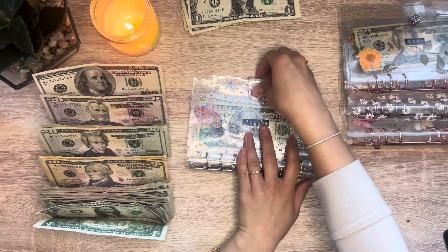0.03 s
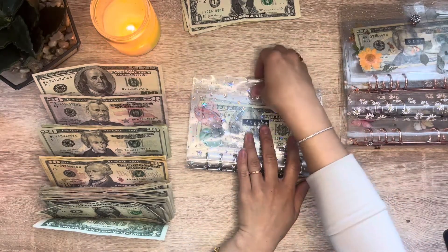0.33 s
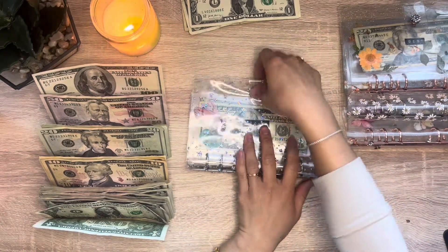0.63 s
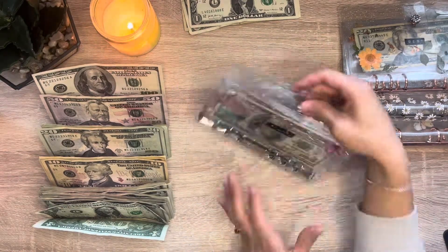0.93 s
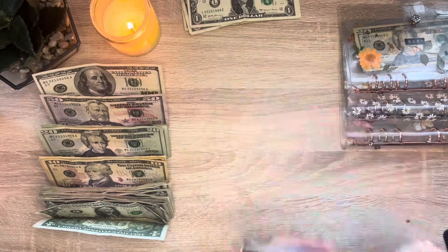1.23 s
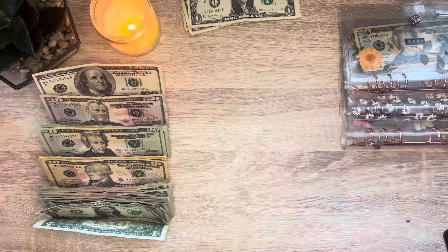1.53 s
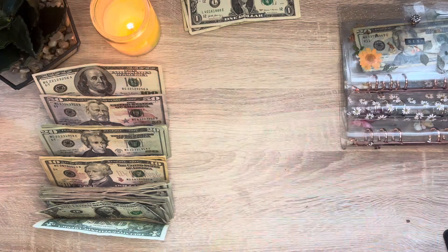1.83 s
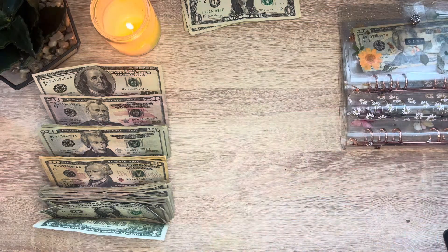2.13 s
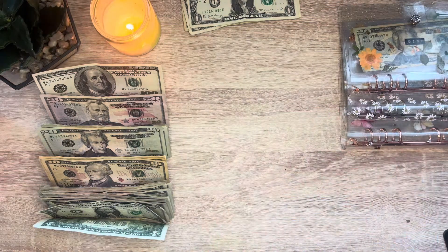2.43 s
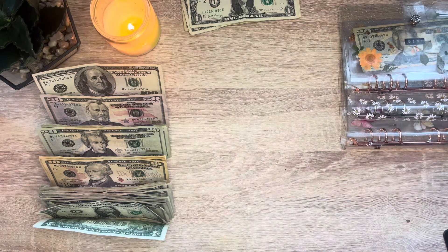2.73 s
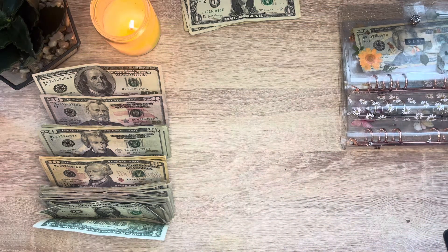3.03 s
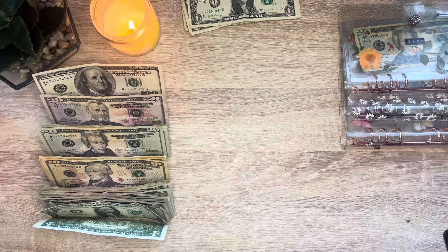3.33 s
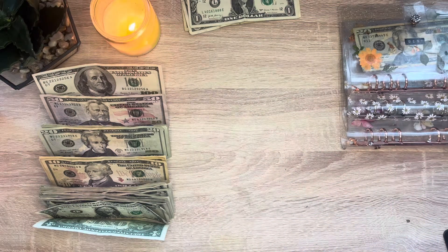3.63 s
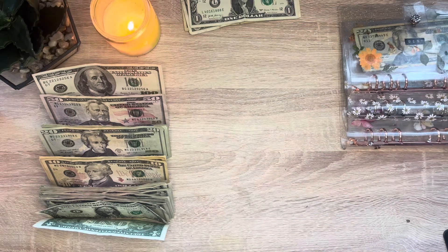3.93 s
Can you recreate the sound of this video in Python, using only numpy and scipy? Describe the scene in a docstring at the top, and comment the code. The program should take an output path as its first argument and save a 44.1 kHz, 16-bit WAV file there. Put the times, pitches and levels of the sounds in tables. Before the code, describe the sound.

In a small room with faint humming ventilation, a plastic binder's fastener closes with one sharp, close snap. Quieter crackles, knocks and sliding plastic follow as the binder is picked up from a wooden table and set down.

```python
"""A press stud snaps a plastic cash binder shut on a wooden table; it cracks and the cover rings.
The binder is lifted and put down to one side: the spine knocks, the table thumps, the plastic
clicks as it buckles and the sleeves slide with grainy friction. Ventilation hums low in a
small room, heard through a closely spaced pair of microphone ports."""
import sys
import numpy as np
from scipy import signal
from scipy.fft import rfft, irfft
from scipy.io import wavfile

SR = 44100
rng = np.random.default_rng(int(sys.argv[2]) if len(sys.argv) > 2 else 0)


def to_wav(s):
    """Save 16-bit WAV."""
    ch = np.atleast_2d(s).T  # columns
    pcm = np.round(np.clip(ch, -1, 1) * 32767)  # PCM
    wavfile.write(sys.argv[1], SR, pcm.astype(np.int16))


N = 176400
T = np.arange(N) / SR
F = np.maximum(np.fft.rfftfreq(N, 1 / SR), 1)


def undb(db):
    """Decibels to gain."""
    return 10 ** (np.asarray(db) / 20)


def unit(x):
    """Scale to unit energy."""
    return x / np.sqrt(np.sum(x ** 2))


def curve(points):
    """Join (f/Hz, value) points on a log-frequency axis."""
    hz, values = np.array(points).T
    return np.interp(np.log(F), np.log(hz), values)


def colour(x, points):
    """Minimum-phase filter that keeps the power of white noise."""
    gain = undb(curve(points))
    cepstrum = irfft(np.log(gain / np.sqrt(np.mean(gain ** 2))), N)
    cepstrum[1:N // 2] *= 2
    cepstrum[N // 2 + 1:] = 0
    return irfft(rfft(x) * np.exp(rfft(cepstrum)), N)


def add(out, start_s, x, db):
    """Mix in a short sound; db is its energy as a level over 3 ms."""
    i = int(start_s * SR)
    x = unit(x)[:N - i] * np.sqrt(.003 * SR)
    out[i:i + len(x)] += undb(db) * x


def noise_pair(side_ratio):
    """Left and right noise spectra with the given side/mid ratio."""
    mid, side = rfft(rng.standard_normal((2, N)))
    return (mid + side_ratio * side * np.array([[1], [-1]])) / np.sqrt(1 + side_ratio ** 2)


def burst(decay_s, size=2600):
    """A contact: tiny uneven fractures that build quickly and die."""
    noise, grain = rng.standard_normal((2, size))
    age = T[:size] / decay_s
    return noise * np.exp(.4 * grain - age) * (1 - np.exp(-age / .2475))


def struck(blows, modes, scatter):
    """Each blow rings the modes, detuned by where it lands."""
    out, t = np.zeros(N), T[:12000]
    for start_s, db in blows:
        detune = 1 + scatter * rng.uniform(-1, 1, len(modes))
        ring = 0
        for k, (hz, mode_db, t60_s) in enumerate(modes):
            fade = np.exp(-np.log(1000) * t / t60_s)
            ring += (-1) ** k * undb(mode_db) * np.sin(2 * np.pi * hz * detune[k] * t) * fade
        add(out, start_s, ring, db)
    return out


# Air rush spectrum: f/Hz, relative density/dB
RUSH_SPECTRUM = [(20, -42), (38, -5.5), (85, -6), (170, -16), (450, -21.5), (750, -21.5), (1200, -32.5),
                 (1900, -27.5), (2800, -46), (5000, -49.5), (16000, -72)]
# Hum resonances: f/Hz, width/Hz, level/dB
HUM_BANDS = [(59, 2, -57), (133, 37, -59.5), (323.3, 41, -70)]
# Stereo width of the air: f/Hz, side/mid ratio
AIR_WIDTH = [(50, .04), (120, 0.047), (700, 0.74), (3000, 0.48), (7000, 0.13)]

def ventilation(rush_db=-54.5):
    """Steady moving air: a soft rush with wavering low resonances."""
    def band_power(shape, db):
        return undb(db) ** 2 * shape ** 2 / np.mean(shape ** 2)

    power = band_power(undb(curve(RUSH_SPECTRUM)), rush_db)
    for hz, width_hz, db in HUM_BANDS:
        power += band_power(1 / (1 + ((F - hz) * 2 / width_hz) ** 2), db)
    lean_db = 2.5 * F / (F + 400)
    balance = undb(np.array([lean_db, -lean_db]) / 2)
    return irfft(noise_pair(curve(AIR_WIDTH)) * np.sqrt(power) * balance, N)


# Reverberant tail: f/Hz, relative level/dB, t60/s
TAIL_BANDS = [(200, -3, 0.21), (400, 2, 0.21), (1307, -4, .24), (4300, -1, 0.27), (6800, -4, 0.21),
              (16000, -10.5, 0.16)]

def room(x, early_db=-7, wall_db=-13, tail_db=-7):
    """Quick reflections off the table top, a duller scattered wall echo, then a short tail."""
    scatter_s, wall_delay_s, tail_delay_s = .003, .021, .0022
    side_ratio = F / (F + 360) / (1 + (F / 6000) ** 8)  # ports hear lows and highs alike
    tail_noise = noise_pair(side_ratio)
    patter = unit(np.exp(-T / scatter_s) * (1 - np.exp(-T / scatter_s)))
    # Below 700 Hz the early reflections merge with the direct sound.
    early = irfft(noise_pair(side_ratio) / (1 + (700 / F) ** 2), N) * patter
    wall = irfft(noise_pair(side_ratio) / (1 + (F / 2000) ** 4), N) * patter
    response = undb(early_db) * early + undb(wall_db) * np.roll(wall, int(wall_delay_s * SR))
    onset = np.clip(T / tail_delay_s - 1, 0, 1)
    for hz, db, t60_s in TAIL_BANDS:
        band = curve([(row[0], row[0] == hz) for row in TAIL_BANDS])
        fade = unit(np.exp(-np.log(1000) * T / t60_s) * onset)
        response += undb(tail_db + db) * irfft(tail_noise * band, N) * fade
    return x + signal.fftconvolve(x[None], response[:, :SR // 2], axes=1)[:, :N]


# Port balance: f/Hz, left minus right/dB
PORT_BALANCE = [(60, .3), (130, 1.2), (370, 4.5), (1000, 0), (3200, -1), (6000, 0)]
# Port phase: f/Hz, left lead/rad
PORT_LEAD = [(20, 0), (150, -.22), (750, -1), (1400, -.65), (2300, -1.6), (4900, -1.5), (5900, -3.14),
             (9300, 0), (15800, 6.2)]

def microphone_ports(x):
    """Two close ports differ in level and phase across frequency."""
    lead_rad = np.interp(F, *np.array(PORT_LEAD).T)
    left = np.exp(1j * lead_rad / 2) * undb(curve(PORT_BALANCE) / 2)
    return irfft(rfft(x) * np.array([left, 1 / left]), N)


def sheet(x, hz, ring_db=6.5, q=3.46):
    """A buckling patch of plastic rings broadly and radiates little far below its pitch."""
    x = signal.lfilter(*signal.butter(1, .17 * hz, "high", fs=SR), x)
    return x + undb(ring_db) * signal.lfilter(*signal.iirpeak(hz, q, fs=SR), x)


# Sheet body spectrum: f/Hz, relative level/dB
BODY_SPECTRUM = [(200, 8), (700, 1), (1300, 0.5), (2200, -3.5), (3000, 1.5), (4000, -4), (5000, -3.5),
                 (7500, -6.5), (12000, -39)]
# Bright edge spectrum: f/Hz, relative level/dB
EDGE_SPECTRUM = [(4000, -12), (6800, 5), (10500, 5.5), (15300, 1.5), (17000, -6)]

def plastic(body, edge):
    """Plastic sounds with a sheet's body and a bright edge."""
    return colour(body, BODY_SPECTRUM) + colour(edge, EDGE_SPECTRUM)


def friction(grain_s=.0007, crinkles_per_s=110, crinkle_db=-6.5, spurt_s=.013, spurt_db=2.5):
    """Sheets advance in grainy spurts and crinkle where they catch; two noises, one envelope."""
    grain = np.exp(.17 * rng.standard_normal(N)[(T / grain_s).astype(int)])
    catches = (rng.random(N) < crinkles_per_s / SR) * rng.exponential(1, N)
    crinkles = np.convolve(catches, np.exp(-2 * T[:200] / grain_s))[:N]
    spurts = undb(spurt_db * np.interp(T / spurt_s, np.arange(N), rng.standard_normal(N)))
    envelope = unit(spurts * (unit(grain) + undb(crinkle_db) * unit(crinkles)))
    return rng.standard_normal((2, N)) * envelope * np.sqrt(N)


# Sleeve and paper slides: t/s, length/s, body level/dB, edge level/dB, ring f/Hz
SLEEVE_SLIDES = [(0.481, 0.047, -71, -78.5, 4400), (0.6, 0.085, -61.5, -81, 2294),
                 (0.742, 0.1, -57.5, -80, 1660), (0.768, 0.1, -62.5, -71, 3670),
                 (1.199, 0.17, -72, -74, 2980), (1.547, 0.21, -69, -78, 1800),
                 (2.565, 0.14, -57, -62, 3800), (2.699, 0.1, -64.5, -66.5, 3370),
                 (2.817, 0.075, -59, -61.5, 3060), (3.322, 0.14, -71, -72, 4000),
                 (3.56, 0.13, -64.5, -62.5, 3660), (3.748, 0.12, -77, -79, 4190)]

def sleeves():
    """Sleeves and paper rub, swelling and fading with each push."""
    body, edge = np.zeros((2, N))
    body_rub, edge_rub = friction()
    for start_s, length_s, body_db, edge_db, hz in SLEEVE_SLIDES:
        push = np.exp(-np.abs(2 * (T - start_s) / length_s - 1) ** 2.6)
        body += undb(body_db) * push * unit(sheet(body_rub, hz)) * np.sqrt(N)
        edge += undb(edge_db) * push * edge_rub
    return plastic(body, edge)


# Plastic clicks: t/s, body level/dB, edge level/dB, decay/s, ring f/Hz
PLASTIC_CLICKS = [(0.758, -59, -75, 0.0015, 1650), (0.7688, -36.5, -54, 0.0066, 2940),
                  (0.7725, -31, -37, 0.0021, 1960), (0.777, -32.5, -52, 0.0015, 4840),
                  (.871, -45.5, -79, 0.0016, 1770), (1.201, -44.5, -49.5, 0.0015, 1410),
                  (1.2102, -46, -54, 0.0087, 2700), (1.2441, -40, -49, 0.0015, 1470),
                  (1.636, -51.5, -66.5, 0.0062, 1750), (1.7203, -52.5, -66, 0.003, 1770),
                  (1.8167, -40, -45, 0.00076, 3500), (1.8224, -56, -64, 0.0018, 4200),
                  (2.214, -60.5, -73.5, 0.0023, 3200), (2.4643, -48.5, -52.5, 0.0036, 4100),
                  (2.572, -45.5, -40.5, 0.0043, 1370), (2.5791, -34.5, -39, 0.0053, 3850),
                  (2.585, -34.5, -36, 0.0027, 4700), (2.593, -43.5, -44, 0.019, 2230),
                  (2.628, -47, -45, 0.0015, 3500), (2.832, -57, -43, 0.0075, 3200),
                  (2.8388, -49, -40, 0.0016, 3760), (2.965, -65, -66.5, 0.0019, 4350),
                  (3.0799, -52, -45, 0.00045, 9500), (3.5485, -61.5, -62, 0.0035, 4440),
                  (3.9224, -63.5, -63.5, 0.0043, 7300)]

def clicks():
    """Patches of plastic buckle with short clicks and crackles."""
    body, edge = np.zeros((2, N))
    for start_s, body_db, edge_db, decay_s, hz in PLASTIC_CLICKS:
        add(body, start_s, sheet(burst(decay_s), hz), body_db)
        add(edge, start_s, burst(decay_s), edge_db)
    return plastic(body, edge)


# Spine knocks: t/s, level/dB, f/Hz
SPINE_KNOCKS = [(1.2021, -37.5, 1050), (1.2471, -41, 1050), (1.8169, -48.5, 1170), (2.5726, -34.5, 1014),
                (2.5735, -37.5, 730), (2.582, -38.5, 1063)]
# Spine modes: ratio to the knock's f, relative level/dB, t60/s
SPINE_RING = [(0.998, -14.5, 0.031), (1.13, -8.5, 0.0035), (1.37, -17.5, 0.005)]

def spine():
    """Each knock rings the stiff spine at a pitch set by how it is held."""
    out = np.zeros(N)
    for start_s, db, hz in SPINE_KNOCKS:
        modes = [(hz * ratio, mode_db, t60_s) for ratio, mode_db, t60_s in SPINE_RING]
        out += struck([(start_s, db)], modes, scatter=.0067)
    return out


# Blows on the table: t/s, level/dB
TABLE_THUMPS = [(.038, -31.5), (.7795, -28), (.838, -33.5), (2.578, -36.5)]
# Table modes: f/Hz, relative level/dB, t60/s
TABLE_RING = [(133.55, -1.5, 0.088), (173, 2, 0.02)]

def table():
    """The wooden table thumps under the binder."""
    return struck(TABLE_THUMPS, TABLE_RING, scatter=.0043)


# Cover slaps: t/s, level/dB
COVER_SLAPS = [(.0368, -16), (2.5745, -41)]
# Cover modes: f/Hz, relative level/dB, t60/s
COVER_RING = [(246.1, -6, 0.035), (318.3, -1, 0.063), (448.3, 1, 0.05), (640, -2.5, 0.029), (745, 5, .016),
              (1670, -3, 0.01527)]

def cover():
    """The cover rings when driven against the table."""
    return struck(COVER_SLAPS, COVER_RING, scatter=.0023)


# Stud catches: t/s, level/dB, decay/s
STUD_CATCHES = [(0.0354, -19, 0.001), (.0363, -20.5, 0.00097), (0.0378, -24, 0.001), (0.0451, -32, 0.0024)]
# Crack spectrum: f/Hz, relative level/dB
CRACK_SPECTRUM = [(100, -9), (260, -1.5), (600, 5.5), (1000, -1), (1700, -3.5), (2250, -16.5), (2900, -3),
                  (3700, -5), (5200, -4.5), (7000, -8.5), (11000, -10.5), (16000, -17.5)]
# Cap modes: f/Hz, relative level/dB, t60/s
CAP_RING = [(4320, 0, .013), (4680, -4, .011)]

def press_stud(cap_db=-20.5):
    """The stud cracks home in quick catches; the first rings its cap briefly."""
    crack = np.zeros(N)
    for start_s, db, decay_s in STUD_CATCHES:
        add(crack, start_s, burst(decay_s), db)
    cap = struck([(STUD_CATCHES[0][0], cap_db)], CAP_RING, scatter=0)
    return colour(crack, CRACK_SPECTRUM) + cap


def scene():
    """The binder in the ventilated room, picked up by two ports."""
    binder = press_stud() + cover() + sleeves() + clicks() + spine() + table()
    return microphone_ports(room(binder) + ventilation())


def record(dry, cutoff_hz=16100):
    """A steep low-pass cuts the top treble."""
    return signal.sosfilt(signal.ellip(8, .2, 70, cutoff_hz, fs=SR, output="sos"), dry)


dry = scene()
out = record(dry)
to_wav(out)
```